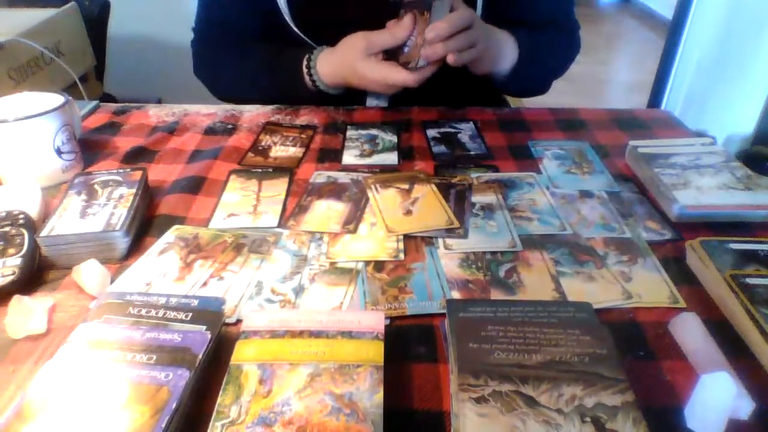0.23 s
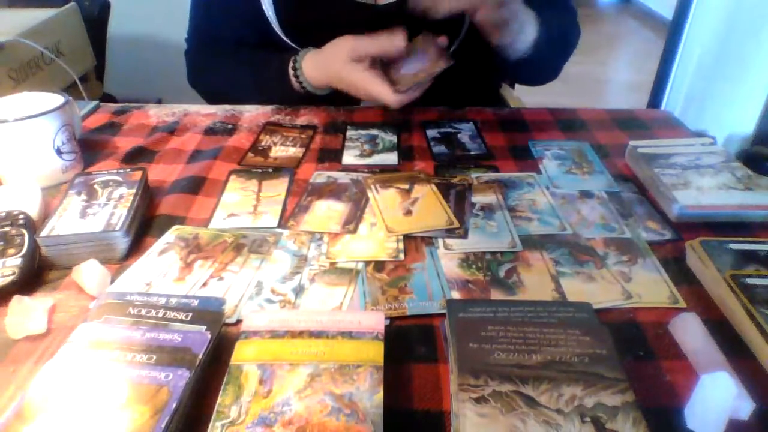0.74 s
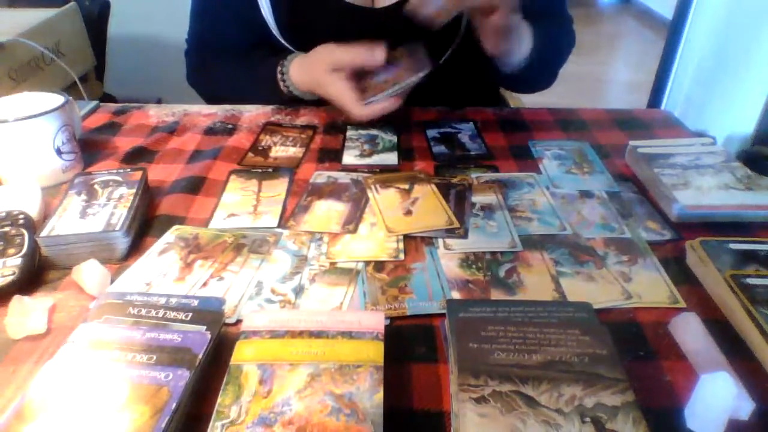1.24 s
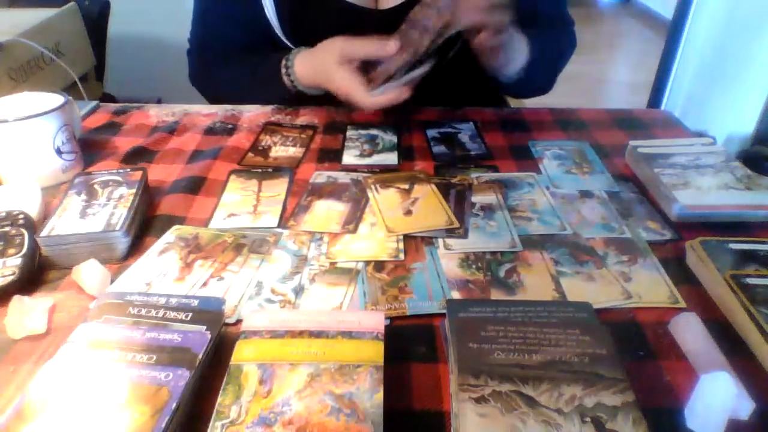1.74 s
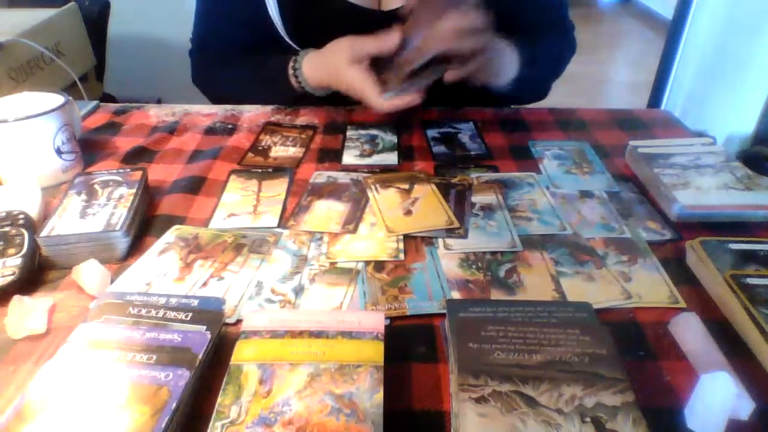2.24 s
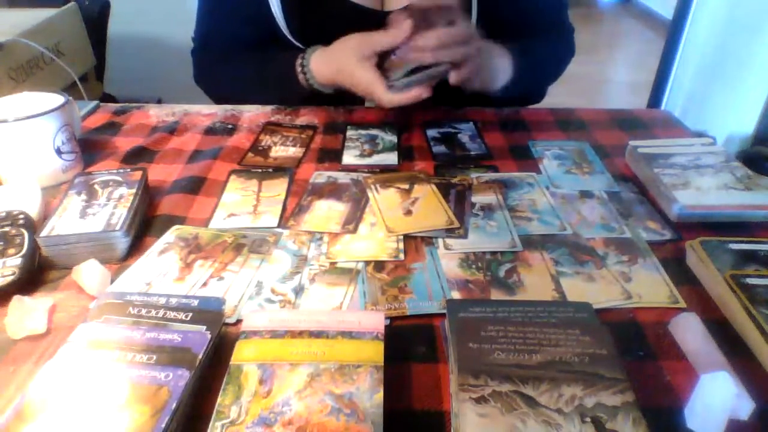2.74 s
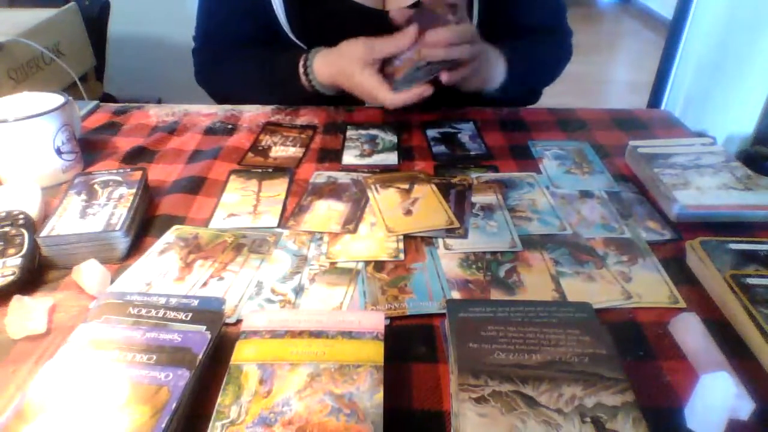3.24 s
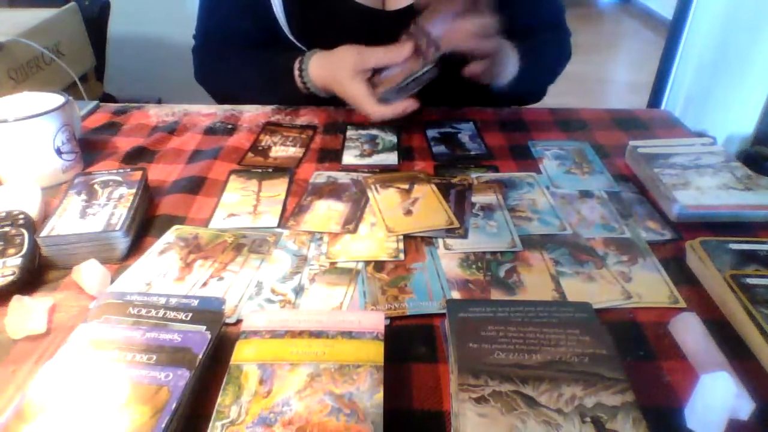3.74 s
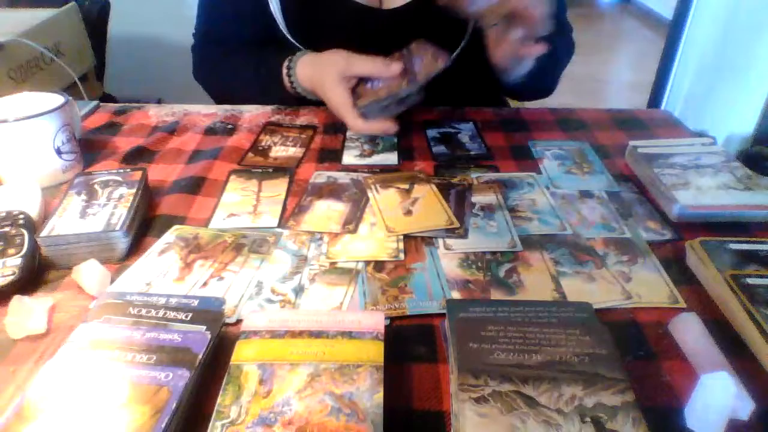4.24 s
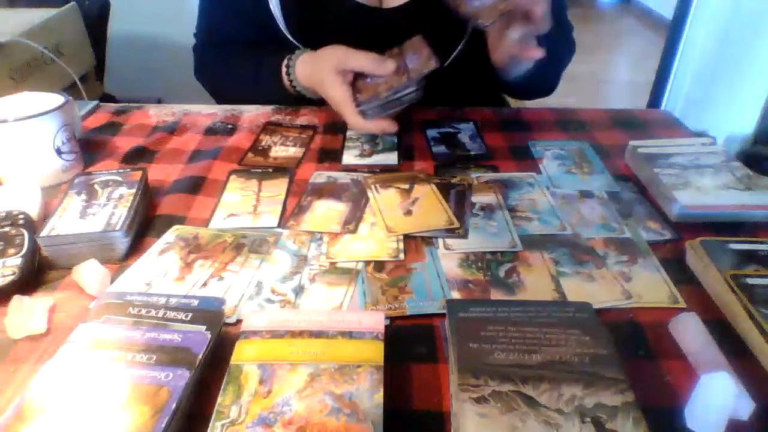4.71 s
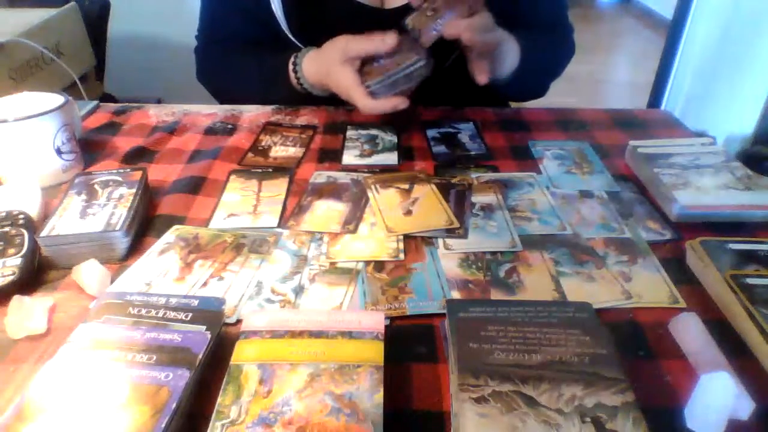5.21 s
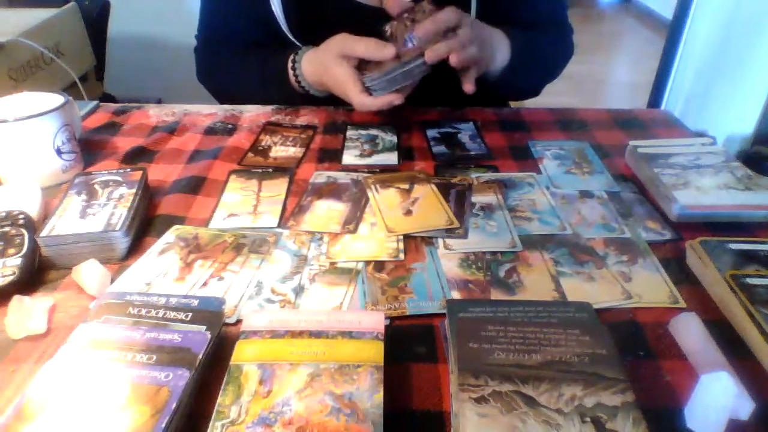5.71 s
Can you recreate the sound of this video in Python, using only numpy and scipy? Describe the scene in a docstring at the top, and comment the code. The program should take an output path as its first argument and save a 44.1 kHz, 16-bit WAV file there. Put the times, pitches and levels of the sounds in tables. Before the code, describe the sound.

A deck of cards is shuffled overhand in quick regular strokes, with papery hisses, crisp edge snaps and soft knocks over a faint hum.

```python
"""A small room, where a deck of cards is shuffled overhand above a cloth-covered table.
Packets slide off the deck with a papery hiss of shaped noise; card edges snap free as cracks with a short ring.
Packets drop on the pile in the palm as damped knocks with a puff of noise.
Each stroke is a touch, a glide and a draw; at the end the fingers push the deck square.
An appliance hums faintly under it all, a slowly beating set of sines over room and microphone noise."""
import sys
import numpy as np
from scipy import signal
from scipy.fft import rfft, irfft, next_fast_len
from scipy.io import wavfile
from scipy.ndimage import uniform_filter1d, map_coordinates

SR = 44100
rng = np.random.default_rng(int(sys.argv[2]) if len(sys.argv) > 2 else 0)


def generate_wav(signal):
    """Clip the signal to [-1, 1] and save it as 16-bit WAV at the path in sys.argv[1]."""
    frames = np.transpose(np.atleast_2d(signal))
    scaled = np.clip(frames, -1, 1) * 32767
    pcm = np.round(scaled).astype(np.int16)
    wavfile.write(sys.argv[1], SR, pcm)


N = 263157  # length in samples
TOP_HZ = 15900  # band limit of the snaps and the recorder


def amp(db):
    """Decibels to gain."""
    return 10 ** (np.asarray(db) / 20)


def unit(x):
    """Scale to rms 1."""
    return x / np.sqrt(np.mean(x ** 2) + 1e-20)


def along(points, hz):
    """Read (Hz, value) points on a log frequency axis."""
    point_hz, value = np.transpose(points)
    return np.interp(np.log(hz + 1), np.log(point_hz + 1), value)


def wobble(rate):
    """A smooth random curve with rate knots a second."""
    knots = rng.standard_normal(int(N * rate / SR) + 4)
    return map_coordinates(knots, [np.arange(N) * rate / SR])


def coloured(x, spectrum):
    """Shape x by a spectrum and bring it to rms 1."""
    m = next_fast_len(N + SR // 4)
    gain = amp(along(spectrum, np.fft.rfftfreq(m, 1 / SR)))
    return unit(irfft(rfft(x, m) * gain, m)[:N])


def add(track, s, sound):
    """Mix a sound into the track from time s in seconds."""
    start = max(round(s * SR), 0)
    part = track[start:start + len(sound)]
    part += sound[:len(part)]


# Colour of card faces rubbing. Each row: frequency in Hz, relative level in dB.
FACE_SPECTRUM = [(300, -9), (1200, -26), (2500, -8.5), (4000, 1.5), (7000, 2), (9500, 0.5), (11000, -5),
                 (14000, -20)]
# Colour of the flexing cards. Each row: frequency in Hz, relative level in dB.
FLEX_SPECTRUM = [(150, -62), (300, -15), (520, 0.5), (850, -3.5), (1300, 1), (2200, 1), (3500, -3),
                 (5000, -6), (8000, -16.5), (16000, -21)]
# Colour of the glossy coating, barely touched. Each row: frequency in Hz, relative level in dB.
SHEEN_SPECTRUM = [(5000, -27), (9000, -11.5), (11000, -3), (13500, 2.5), (15400, 5.5), (16200, -11.5)]


def slides():
    """Card faces slide past each other: a light touch sizzles, under pressure the cards flex and sound lower."""
    hiss, flex, sheen = rubs()
    # edges catch at random: each catch is a brief surge that dies in a millisecond or two
    catches = (rng.random(N) < 130 / SR) * rng.exponential(1, N)
    surge = 1 + 0.59 * signal.lfilter([1], [1, -np.exp(-1 / (0.00063 * SR))], catches)
    grip = amp(1.53 * wobble(150))
    faces = amp(-2.0) * np.sqrt(hiss) * friction(FACE_SPECTRUM, grain_db=1.5, patchy_db=3.0)
    flexing = np.sqrt(flex) * friction(FLEX_SPECTRUM, grain_db=4.0, patchy_db=4.5)
    coating = amp(0.53) * np.sqrt(sheen) * friction(SHEEN_SPECTRUM, grain_db=1.5, patchy_db=1.5)
    return grip * (surge * (faces + flexing) + coating)


def friction(spectrum, grain_db, patchy_db):
    """Tiny slips of uneven size, through card resonances that shift with the grip."""
    slips = rng.standard_normal(N) * amp(grain_db * wobble(1400))
    z = signal.stft(slips, nperseg=256)[2]
    # random gains, smoothed over frequency and then over time
    grip = uniform_filter1d(rng.standard_normal(z.shape), size=3, axis=0)
    grip = uniform_filter1d(grip, size=18, axis=1)
    patchy = signal.istft(z * amp(patchy_db * unit(grip)), nperseg=256)[1][:N]
    return coloured(patchy, spectrum)


# Rise and fall below: seconds to 20 dB under full speed. Levels are nominal, ahead of the mix in slides().
TOUCH_RISE_S, TOUCH_FALL_S, TOUCH_SHEEN_DB = 0.017, 0.059, -1  # the deck meets the pile and brakes
GLIDE_LAG_S, GLIDE_RISE_S = 0.045, 0.075  # it comes in softly, at full speed soon after the touch
GLIDE_FLEX_DB, GLIDE_FALL_S = -12.5, 0.086  # light contact from touch to draw
DRAW_RISE_S, DRAW_FALL_S = 0.047, 0.071  # it gathers speed as it is pulled free
SKID_RISE_S, SKID_FALL_S = 0.02, 0.028
PUSH_RISE_S, PUSH_FALL_S = 0.024, 0.052
# The deck touches the pile and a stroke begins.
# Each row: time in seconds, hiss in dB, flexing in dB relative to the hiss.
TOUCHES = [(0.5, -72, -2), (0.991, -65.5, -7), (1.496, -48, -11), (1.914, -56, -15), (2.419, -47.5, 0.5),
           (2.875, -47.5, -3.5), (3.326, -39, -19), (3.759, -43, -15), (4.171, -45.5, -11.5),
           (4.601, -45.5, -12.5), (5.003, -44.5, -4.5)]
# The packet glides on and is drawn out, one row for each touch.
# Each row: full speed in seconds, hiss in dB, flexing and sheen in dB relative to the hiss, glide hiss in dB.
DRAWS = [(0.627, -56, -8, 5, -65), (1.138, -49, -19, 5, -65), (1.641, -46.5, -11, 3.5, -67.5),
         (2.133, -44.5, -17.5, 2.5, -61.5), (2.598, -47, -8, 1.5, -58.5), (3.06, -47, -9, 1.5, -56),
         (3.427, -47.5, -15, -1.5, -66), (3.869, -45, -14.5, -3, -56.5), (4.31, -55.5, -26, 3.5, -59.5),
         (4.742, -56.5, -17, 6, -62.5), (5.131, -49.5, -7.5, 1.5, -60)]
# Loose cards skid over the pile.
# Each row: time in seconds, hiss in dB, flexing and sheen in dB relative to the hiss.
SKIDS = [(1.034, -59, 2, -5), (1.178, -39.5, -11, -1), (1.579, -54.5, -4, 1), (1.659, -38, -10, -3),
         (1.973, -52, -5, 2), (2.03, -55, -15, -6), (2.177, -48, -3, -2), (2.392, -54, -27, 2),
         (2.44, -49.5, 2, -10), (2.486, -48.5, 0, 2.5), (2.755, -61, -7, -4), (2.946, -56.5, 4, -5),
         (3.102, -52, 0, 5), (3.491, -42, -7, 0), (3.893, -49, -22, 7), (3.928, -53, -5.5, 4),
         (4.355, -50.5, -6.5, 7), (4.583, -55.5, -12, 4), (4.631, -48, -6, -11), (4.766, -52, -4, 1),
         (5.042, -42.5, -7.5, -3)]
# Fingers push the deck square.
# Each row: time in seconds, hiss in dB, flexing and sheen in dB relative to the hiss.
PUSHES = [(5.367, -54, 4, -2), (5.403, -52.5, 3.5, -5), (5.5, -50, 5.5, -5), (5.627, -70, 6.5, 6),
          (5.721, -58.5, -7, 1), (5.817, -53, -6.5, -4), (5.964, -52, -5, -0.5)]


def rubs():
    """Power of hiss, flexing and sheen over time; every movement gathers speed, then brakes."""
    t = np.arange(N) / SR
    power = np.zeros((3, N))

    def rub(start, end, db, flex_db, sheen_db, rise, fall):
        """One movement, at full speed from start to end."""
        near = slice(max(int((start - 2 * rise) * SR), 0), int((end + 2 * fall) * SR))
        before = np.maximum(start - t[near], 0) / rise
        after = np.maximum(t[near] - end, 0) / fall
        layers_db = np.array([[0], [flex_db], [sheen_db]])
        power[:, near] += amp(db - 20 * (before ** 2 + after) + layers_db) ** 2

    for (touch, touch_db, touch_flex_db), draw_row in zip(TOUCHES, DRAWS):
        draw, draw_db, draw_flex_db, sheen_db, glide_db = draw_row
        rub(touch, touch, touch_db, touch_flex_db, TOUCH_SHEEN_DB, TOUCH_RISE_S, TOUCH_FALL_S)
        rub(touch + GLIDE_LAG_S, draw, glide_db, GLIDE_FLEX_DB, sheen_db, GLIDE_RISE_S, GLIDE_FALL_S)
        rub(draw, draw, draw_db, draw_flex_db, sheen_db, DRAW_RISE_S, DRAW_FALL_S)
    for s, db, flex_db, sheen_db in SKIDS:
        rub(s, s, db, flex_db, sheen_db, SKID_RISE_S, SKID_FALL_S)
    for s, db, flex_db, sheen_db in PUSHES:
        rub(s, s, db, flex_db, sheen_db, PUSH_RISE_S, PUSH_FALL_S)
    return power


SNAP_T60_S = 0.0105  # the crack falls 60 dB in this time
# Card edges snap free. Each row: start in seconds, nominal level in dB, brightness in dB per octave,
# card ring in Hz, nominal ring level in dB relative to the crack.
SNAPS = [(0.6417, -21, 2, 2925, -12), (0.647, -22, -3, 2640, -16), (1.0216, -28, 7, 2300, -32),
         (1.168, -15.5, 3.5, 5000, -23), (1.1764, -13, 0, 3876, -11.5), (1.176, -28, -6.5, 1370, -3.5),
         (1.1813, -17.5, 3, 7270, -9), (1.2335, -31, -3, 1370, -14), (1.5375, -30.5, -3, 1300, -13.5),
         (1.6592, -27.5, -2, 2340, -9), (1.9807, -29.5, 2.5, 1790, -18.5), (2.4114, -20, -2, 1376, -15),
         (2.4269, -19.5, -1, 1540, -14), (2.647, -15.5, 1.5, 2440, -15), (2.7397, -35, -1.5, 3270, -18),
         (2.8709, -28, -2, 5000, -9), (2.8769, -24, -5.5, 4300, -10.5), (3.0658, -19, 5.5, 5560, -28),
         (3.0735, -22.5, 6.5, 5260, -24), (3.478, -20.5, 0.5, 5250, -4), (3.534, -20, -2, 2640, -26),
         (3.7867, -33, -2.5, 5170, -20), (3.893, -21.5, -0.5, 5820, -7.5), (3.9078, -16, -0.5, 5380, -14),
         (3.9273, -23, -1.5, 1218, -15), (4.1689, -26, -1.5, 4340, -15), (4.219, -27.5, 12, 1820, -25),
         (4.3532, -31, 0.5, 1800, -23), (4.7583, -30, 8, 6200, -25), (4.992, -19.5, 0.5, 3320, -19),
         (5.0223, -30, -2, 1770, -5), (5.165, -24, -3, 2384, -4), (5.404, -29.5, -1.5, 1140, -9),
         (5.442, -30, -5.5, 4630, -8), (5.504, -27, -2.5, 4930, -1)]
# Colour of a crack ahead of its brightness. Each row: frequency in Hz, relative level in dB.
EDGE_SPECTRUM = [(200, -11.5), (600, -13.5), (1300, -10.5), (2700, 1.5), (5000, 2), (7500, 2.5),
                 (10000, -4.5), (13000, 1.5), (16000, 3.5)]


def snaps():
    """An edge lets go with a sharp crack, and the bent card rings for a few cycles."""
    out, t = np.zeros(N), np.arange(SR // 16) / SR
    f = np.fft.rfftfreq(len(t), 1 / SR)
    for s, db, tilt, hz, ring_db in SNAPS + ticks():
        tilt_db = tilt * np.log2(np.maximum(f, 500) / 5000)
        colour = amp(along(EDGE_SPECTRUM, f) + tilt_db) * (f < TOP_HZ)
        noise = unit(irfft(rfft(rng.standard_normal(len(t))) * colour, len(t)))
        crack = noise * amp(-60 * t / SNAP_T60_S)
        ring = amp(ring_db + 1.0) * ringing(hz, t60=0.031, spread=0.1455, t=t)
        add(out, s, amp(db - 7.5) * (crack + ring))
    return out


TICKS_PER_STROKE = 2
TICK_DB, TICK_SCATTER_DB = -34.5, 2.5  # nominal level and its spread
TICK_RING_HZ, TICK_RING_DB = 2950, -21  # centre of the random pitches, nominal ring level
TICK_FULL_DB = -60  # under a softer touch than this they are fainter


def ticks():
    """Lesser edges catch at random moments between touch and draw, as rows like those of SNAPS."""
    rows = []
    for (touch, touch_db, _), (draw, *_) in zip(TOUCHES, DRAWS):
        for when, size, pitch in rng.uniform(-0.85, 1, (TICKS_PER_STROKE, 3)):
            db = TICK_DB + TICK_SCATTER_DB * size + min(touch_db - TICK_FULL_DB, 0)
            s = touch + (draw - touch) * when ** 2  # they crowd towards the touch
            rows.append((s, db, 0, TICK_RING_HZ * 2 ** pitch, TICK_RING_DB))
    return rows


# Packets land in the palm. Each row: start in seconds, nominal level in dB, knock in Hz.
DROPS = [(0.642,-40.5,850), (1.177,-55,564), (1.657,-42.5,855), (1.975,-49,508), (2.412,-32,836),
         (2.428,-42,480), (2.648,-38,1120), (3.104,-40,410), (3.535,-42.5,473), (3.927,-39,506),
         (4.767,-44,730), (5.157,-32,810), (5.343,-35.5,1186), (5.489,-36,634), (5.825,-37,210)]


def drops():
    """The pile takes each packet with a dull knock and a puff of air; the palm damps it quickly."""
    out, t = np.zeros(N), np.arange(SR // 8) / SR
    f = np.fft.rfftfreq(len(t), 1 / SR)
    for s, db, hz in DROPS:
        t60 = 0.022 + 11 / hz  # low knocks last longer
        knock = 0.44 * ringing(hz, t60=t60, spread=0.33, t=t)
        band = np.exp(-(np.log2((f + 1) / hz) / 1.06) ** 2)  # width in octaves
        noise = unit(irfft(rfft(rng.standard_normal(len(t))) * band, len(t)))
        puff = 0.66 * noise * amp(-60 * t / (1.01 * t60))
        onset = 1 - np.exp(-t / 0.00087)
        add(out, s, amp(db - 2) * (knock + puff) * onset)
    return out


def ringing(hz, t60, spread, t):
    """A held card has a cluster of close, heavily damped modes, different in every grip."""
    place = np.linspace(-1, 1, num=5)
    freq = hz * (1 + spread * (place + 0.185 * rng.standard_normal(len(place))))
    phase = rng.uniform(0, 2 * np.pi, len(place))
    # the middle modes are the strongest
    modes = np.exp(-place ** 2) @ np.sin(2 * np.pi * freq[:, None] * t + phase[:, None])
    fade = amp(-60 * t / t60)
    return modes * fade * np.linalg.norm(fade) / np.linalg.norm(modes * fade)


# Decay of the room. Each row: frequency in Hz, time to fall 60 dB in seconds.
ROOM_DECAY = [(300, 0.24), (800, 0.28), (2200, 0.37), (5500, 0.32), (14000, 0.43)]


def room(x):
    """The table and near walls answer strongly at about 12 ms, within a short tail weakest in the treble."""
    hz, t, z = signal.stft(rng.standard_normal(SR // 2), SR, nperseg=256)
    z = z * amp(-60 * t / along(ROOM_DECAY, hz)[:, None])
    tone_db = along([(200, 6.5), (1500, 2.5), (3000, -0.5), (7000, -7.5), (15000, -12.5)], hz)
    tail = signal.istft(z * amp(tone_db)[:, None], SR, nperseg=256)[1]
    tail = tail / np.linalg.norm(signal.istft(z, SR, nperseg=256)[1])
    t = np.arange(len(tail)) / SR
    early = 1 + 2.4 * np.exp(-((t - .012) / 0.00097) ** 2)
    onset = 1 - np.exp(-t / 0.0006)
    return signal.fftconvolve(x, tail * early * onset)[:N]


HUM_DB = -59  # rms ahead of the beat
BEAT_S, BEAT_CREST_S, BEAT_DEPTH = 1.092, 0.71, 0.39  # period, a crest, share of the second, beating part
RUSH_DB, RUSH_CREST_S, RUSH_WIDTH_S = -69, 1.0, 0.88  # it swells once and dies away
# Lines of the appliance hum. Each row: frequency in Hz, relative level in dB.
HUM_LINES = [(119.7, 1), (256, -19), (463, -35)]
# Colour of a faint midrange rush in the room. Each row: frequency in Hz, relative level in dB.
RUSH_SPECTRUM = [(200, -22), (500, -1), (650, 0.5), (1000, -6), (1400, -1), (1850, -3.5), (2400, -14),
                 (5000, -39)]
# Colour of room and microphone noise. Each row: frequency in Hz, relative level in dB.
AIR_SPECTRUM = [(12, -45), (20, 4), (40, -8.5), (70, -12.5), (134, -15.5), (270, -18), (310, -28),
                (660, -32), (1120, -34), (1710, -35), (2320, -39), (2990, -37.5), (4540, -39),
                (12800, -37.5), (16000, -32.5)]


def background():
    """An appliance hum that beats slowly, over room rumble, a fading rush and microphone hiss."""
    t = np.arange(N) / SR
    beat = np.abs(1 + BEAT_DEPTH * np.exp(2j * np.pi * (t - BEAT_CREST_S) / BEAT_S))
    # the phase of each line wanders a little
    lines = sum(amp(db) * np.sin(2 * np.pi * hz * t + 0.73 * wobble(4.4)) for hz, db in HUM_LINES)
    hum = amp(HUM_DB) * beat * unit(lines)
    swell = np.exp(-((t - RUSH_CREST_S) / RUSH_WIDTH_S) ** 2)
    rush = amp(RUSH_DB) * swell * coloured(rng.standard_normal(N), RUSH_SPECTRUM)
    air = amp(-56.0) * coloured(rng.standard_normal(N), AIR_SPECTRUM)
    return hum + rush + air


def scene():
    """The cards, their room and the background."""
    cards = slides() + snaps() + drops()
    return (cards + amp(-6) * room(cards) + background())[None]


def record(dry):
    """The recorder cuts off steeply above its band limit."""
    m = next_fast_len(N + SR // 4)
    hz = np.fft.rfftfreq(m, 1 / SR)
    return irfft(rfft(dry, m) / np.sqrt(1 + (hz / TOP_HZ) ** 160), m)[..., :N]


dry = scene()
out = record(dry)
generate_wav(out)
```